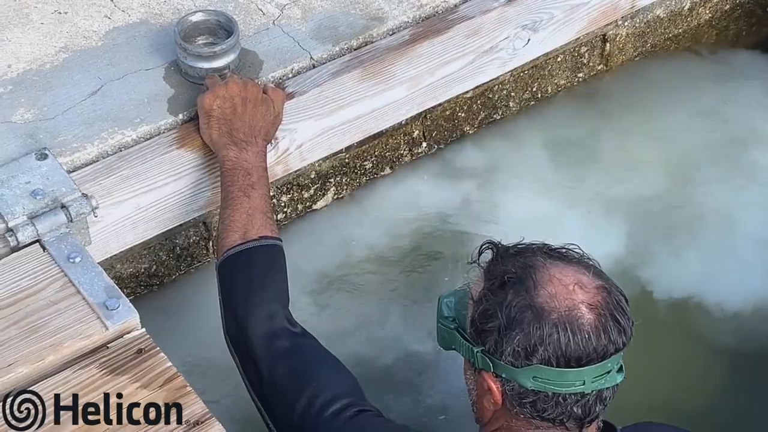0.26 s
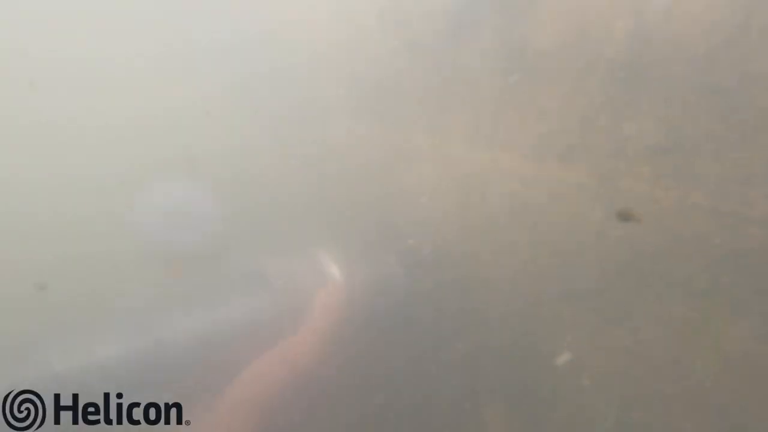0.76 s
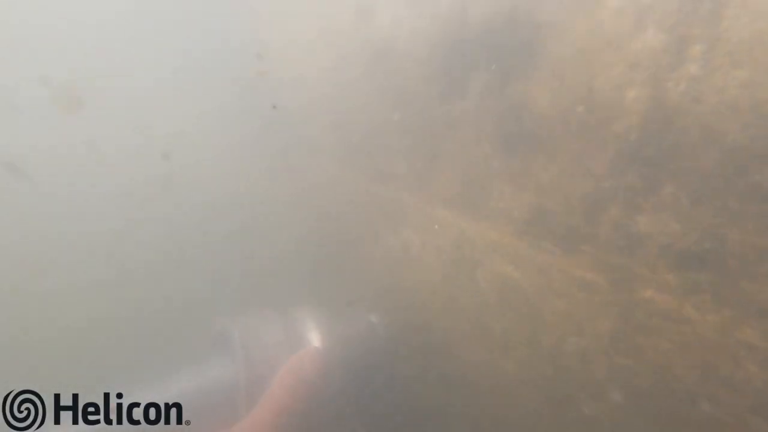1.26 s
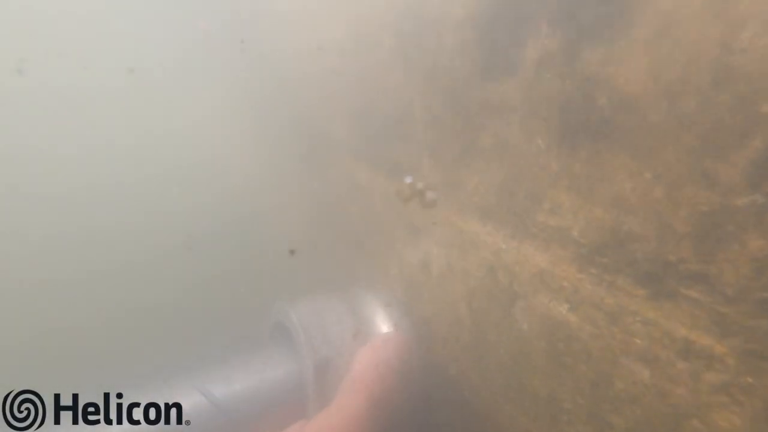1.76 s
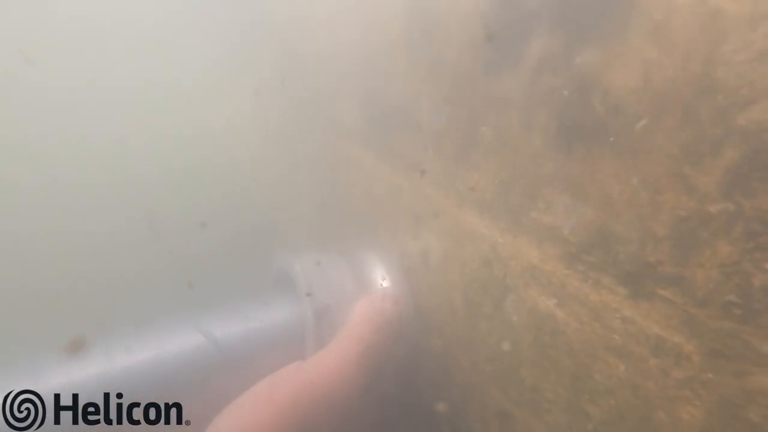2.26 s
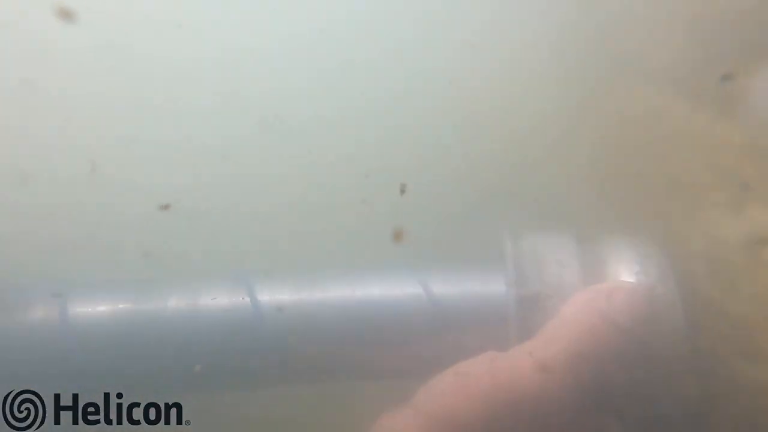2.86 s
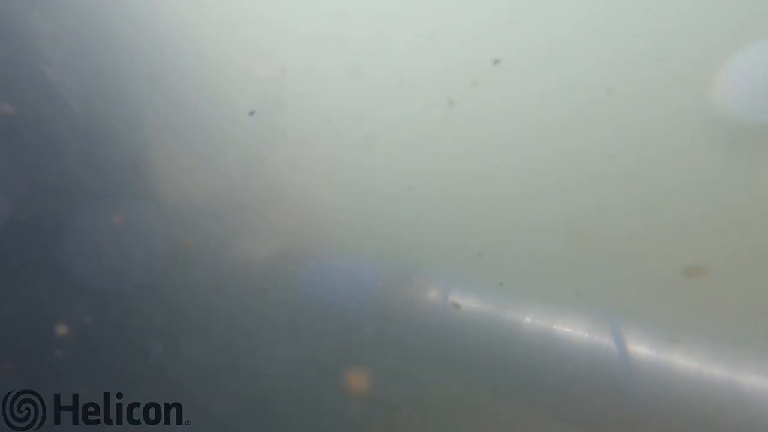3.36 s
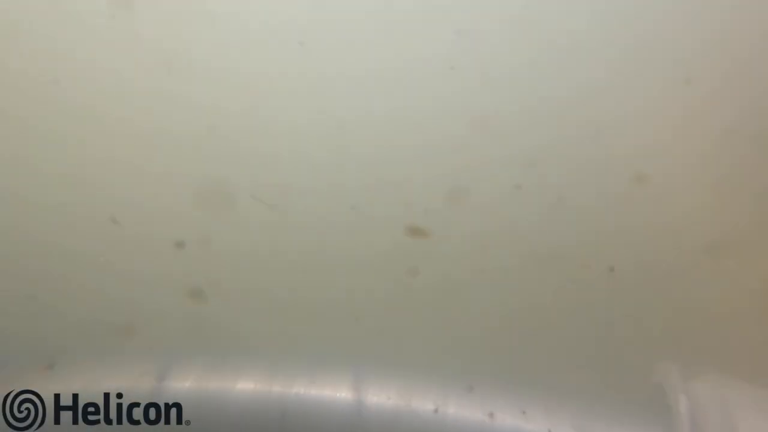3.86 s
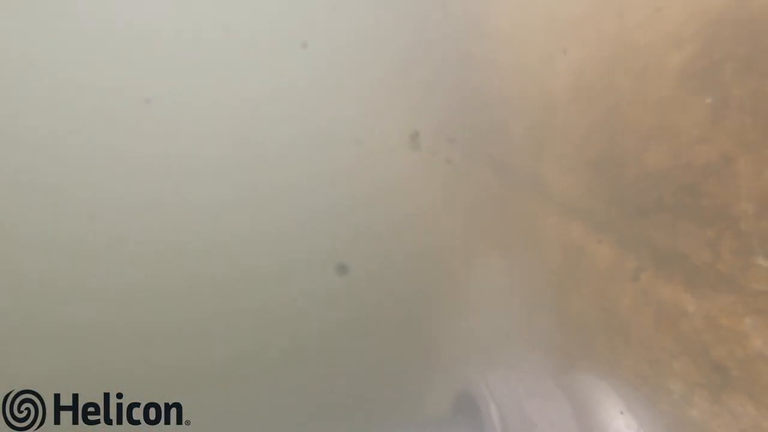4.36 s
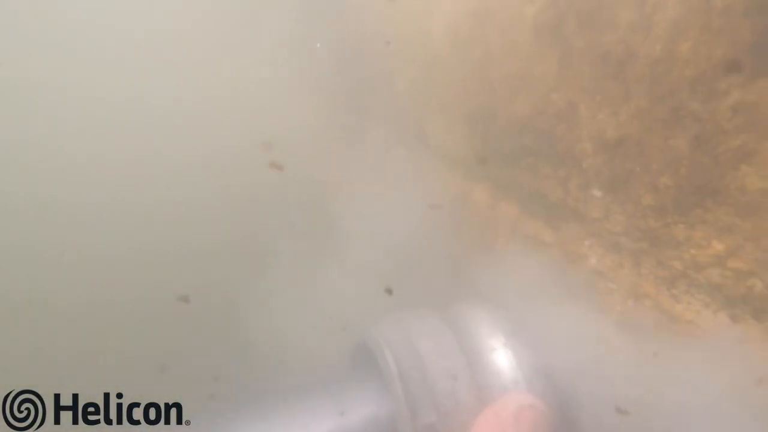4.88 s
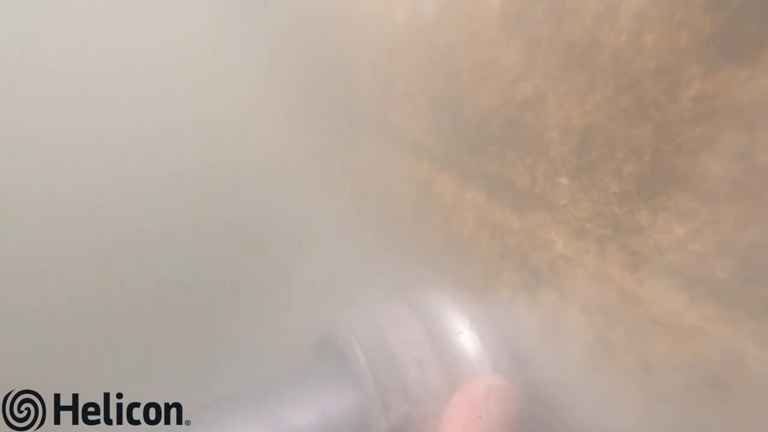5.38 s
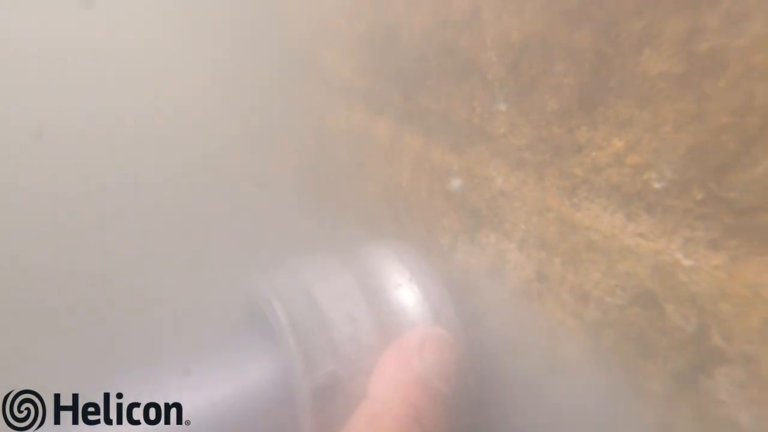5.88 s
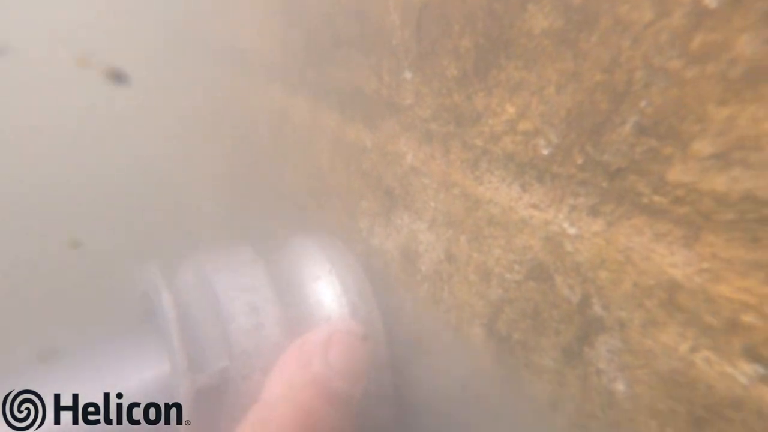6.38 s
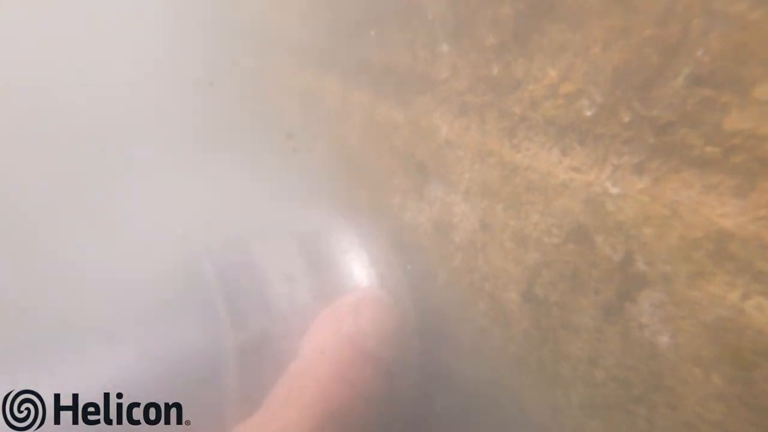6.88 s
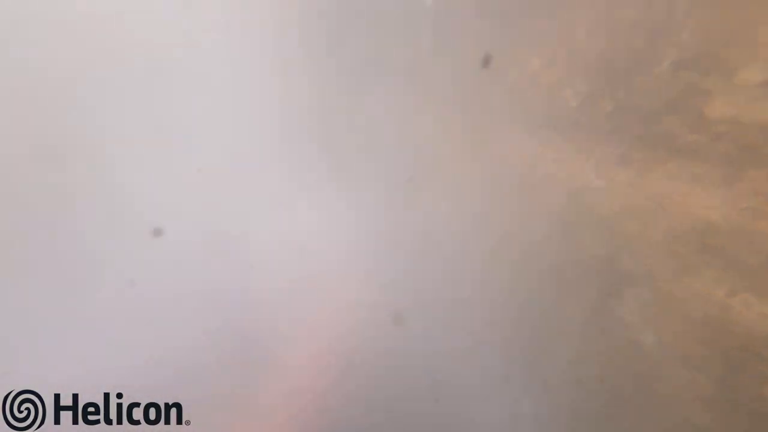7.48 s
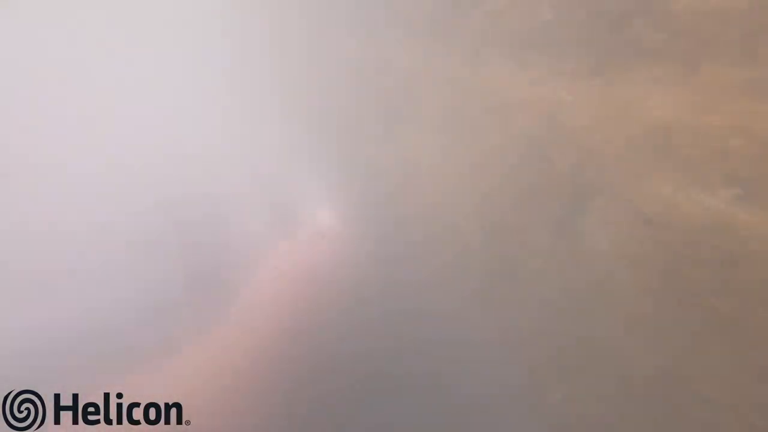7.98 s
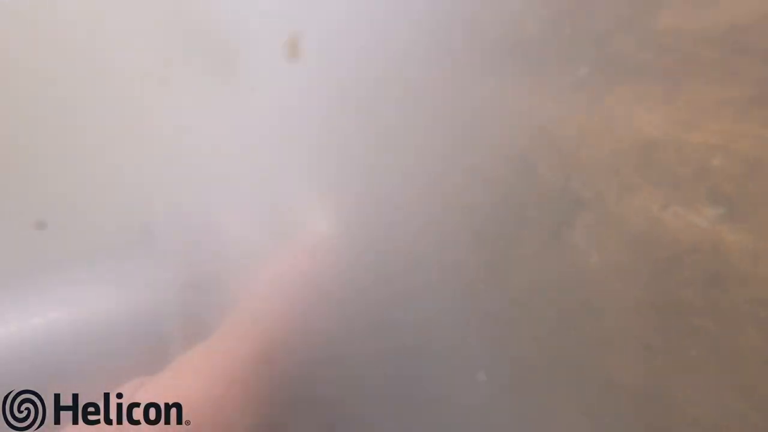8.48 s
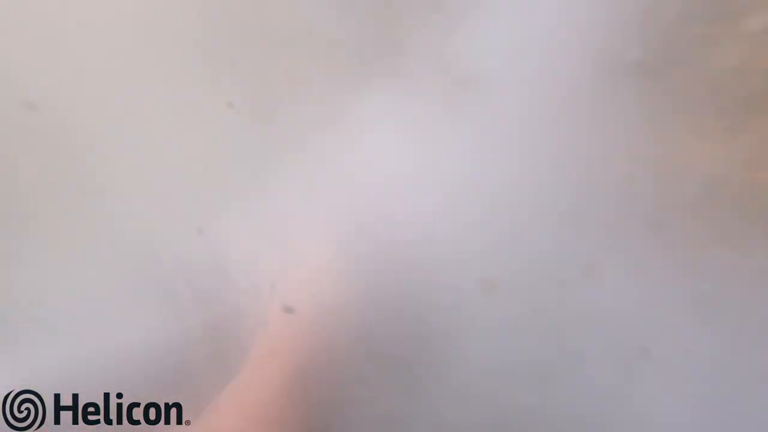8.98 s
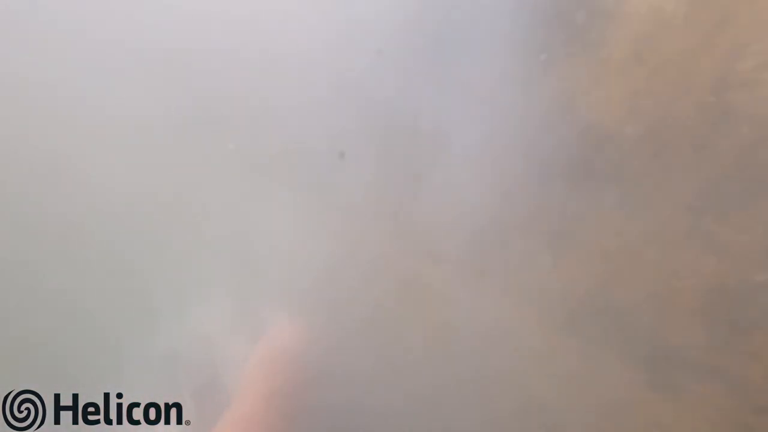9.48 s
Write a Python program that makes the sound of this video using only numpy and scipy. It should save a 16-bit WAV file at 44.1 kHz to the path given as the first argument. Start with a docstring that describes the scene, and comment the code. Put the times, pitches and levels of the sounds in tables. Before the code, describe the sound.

In open air a hydraulic power pack hums and whines for under a second. An abrupt cut goes underwater, heard inside a sealed housing: muffled hiss, low rumble, rubbing, knocks and gurgling bubbles. A drill then spins up quickly with a brief howl and grinds a concrete wall in a dense, steady drone, until it stops sharply and leaves knocks, scrapes and small metallic ringing.

```python
"""In the open air a hydraulic power pack hums: wavering tones, a sagging whine and filtered fan noise.
Then, under water in a sealed housing, the idling drill hisses as filtered grains over rumble and hum.
Hand and gear rub, knock and tick as noise bursts, a metal part rings and bubbles gurgle as short tones.
The motor spins up as orders of its shaft speed; the core bit grinds concrete as dense grains, and stops."""
import sys
import numpy as np
from scipy import signal
from scipy.fft import rfft, irfft
from scipy.io import wavfile

SR = 44100
rng = np.random.default_rng(int(sys.argv[2]) if len(sys.argv) > 2 else 0)


def transcribe(signal):
    """Save signal, clipped to [-1, 1], as a 16-bit WAV file at the path in sys.argv[1]."""
    frames = np.atleast_2d(signal).T
    limited = np.clip(frames, -1, 1)
    pcm = np.round(limited * 32767).astype(np.int16)
    wavfile.write(sys.argv[1], SR, pcm)


N = 429534

DIVE_S = .761   # the air ends, the water begins
START_S, STOP_S = 3.515, 8.97   # the valve opens, the valve shuts
# Hard contacts on the housing: (time [s], relative strength [dB])
KNOCKS = [(1.327, 21), (3.150, 25), (8.999, 13), (9.054, 18), (9.15, 12.5), (9.167, 1), (9.187, 14),
          (9.198, 8), (9.217, 12.5), (9.252, 10), (9.278, 6), (9.293, 2), (9.316, 4), (9.335, 17.5)]


def from_db(db):
    """Decibel law: 20 dB is a factor of ten in amplitude."""
    return 10 ** (np.asarray(db) / 20)


def rms_one(x):
    """Normalisation to unit root-mean-square amplitude."""
    return x / np.sqrt(np.mean(x ** 2) + 1e-20)


def in_time(rows):
    """Linear interpolation of the columns in time, and a gate that is open while the rows last."""
    s, *columns = np.transpose(rows)
    t = np.arange(N) / SR
    gate = (t >= s[0]) & (t < s[-1])
    return [np.interp(t, s, column) for column in columns] + [gate]


def drift(rate_hz):
    """Random modulation of spread 1: white noise through two equal poles at the given rate."""
    step = 40   # samples between computed points
    r = np.exp(-2 * np.pi * rate_hz * step / SR)
    noise = rng.standard_normal(N // step + 2002)
    slow = signal.lfilter([1], [1, -2 * r, r * r], noise)[2000:]   # settled part
    return np.interp(np.arange(N) / step, np.arange(len(slow)), rms_one(slow))


def band_filter(x, order, hz, kind):
    """Butterworth filtering: maximally flat in the pass band."""
    return signal.sosfilt(signal.butter(order, hz, kind, fs=SR, output="sos"), x)


def response_db(points, modes=(), column=1):
    """Magnitude response in dB: a curve over log frequency plus resonance peaks and notches."""
    hz, points = np.linspace(1, SR / 2, 4097), np.array(points)
    db = np.interp(np.log(hz), np.log(points[:, 0]), points[:, column])
    for mode_hz, width_hz, gain_db in modes:
        db = db + gain_db / (1 + (2 * (hz - mode_hz) / width_hz) ** 2)
    return db


def colour(x, db, lead=0):
    """Minimum-phase filtering by folding the cepstrum, with a phase lead (rad) given at each frequency."""
    cepstrum = irfft(db * np.log(10) / 20)
    half = len(cepstrum) // 2
    cepstrum[1:half] *= 2
    cepstrum[half + 1:] = 0
    impulse = irfft(np.exp(rfft(cepstrum) + 1j * lead))
    # The lead spreads the response to negative times: make room, then take the delay off.
    return signal.oaconvolve(x, np.roll(impulse, 256))[256:][:N]


def grains(per_s, spread_db):
    """Shot noise: two trains of clicks at the same random moments with uneven sizes; rms 1."""
    struck = rng.random(N) < per_s / SR
    sizes = struck * from_db(spread_db * np.minimum(rng.exponential(1, N), 4))
    return rms_one(sizes * rng.standard_normal((2, N)))


def housing(common, own):
    """Coherence of two ports: the common part alike, the own part in opposition, each through its wall."""
    # Wall transmission: (frequency [Hz], left [dB], right [dB], lead of the left port over the right [rad])
    wall = [(39, -16.5, -16.5, 0), (158, -6.5, -7.5, 0), (232, -0.5, -2.5, 1), (682, -10, -9, -0.9),
            (810, -4, -2.5, 0.46), (1120, -9, -8, 1.1), (1400, -0.5, -5, 0.5), (1590, -7.5, -10, 0.09),
            (2313, -28.5, -16.5, -1), (2910, -39.5, -33, 0.1), (4040, -34, -37, 0.1),
            (4480, -41.5, -40, 0.6), (9170, -53.5, -52.5, 0.65), (15100, -71.5, -61.5, 3.5)]
    # Wall resonances and notches: (frequency [Hz], width [Hz], gain [dB])
    wall_modes = [(226, 45, 4), (1590, 70, 4), (1825, 130, -7), (1975, 80, 4), (2300, 120, 3),
                  (2650, 50, 5), (3600, 500, 6), (6050, 750, 10), (8540, 700, 6)]
    # Likeness of the two ports: (frequency [Hz], coherence [0-1])
    likeness = [(400, 1), (1500, 0.8), (12000, 0.19)]
    alike = np.clip(response_db(likeness), 0, .99)
    lead = response_db(wall, column=3) / 2   # half to each port
    share_db, rest_db = 10 * np.log10((1 + alike) / 2), 10 * np.log10((1 - alike) / 2)
    ports = []
    for column, sign in ((1, 1), (2, -1)):
        db = response_db(wall, wall_modes, column=column)
        shared = colour(common, db + share_db, sign * lead)
        ports.append(shared + sign * colour(own, db + rest_db))
    return np.array(ports)


def power_pack():
    """Superposition of wavering engine lines, a sagging pump whine and fan noise, alike on both sides."""
    # Engine hum: (frequency [Hz], mean level [dB rms])
    engine_lines = [(113.0, -34.5), (183.0, -39), (215.3, -40.5), (258.4, -38), (387.6, -38), (430.7, -42),
                    (473.7, -37)]
    # Pump whine partials: (multiple of the whine pitch [-], mean level [dB rms])
    whine_partials = [(1, -42), (1.39, -48), (2.202, -50)]
    # Fan noise spectrum: (frequency [Hz], relative density [dB per Hz])
    fan_spectrum = [(30, -16), (109, -11.5), (308, -9.5), (488, -6), (643, -18.5), (974, -14.5),
                    (5880, -33), (7400, -15.5), (9620, -79)]
    # Fan casing resonances: (frequency [Hz], width [Hz], gain [dB])
    casing_modes = [(4230, 180, 3), (5900, 44, 12)]
    whine_from_hz, whine_to_hz, sag_s = 1005, 920, .35
    t = np.arange(N) / SR
    engine = 0
    for hz, db in engine_lines:
        level = np.sqrt(2) * from_db(db + .88 * drift(3.7))
        engine = engine + level * np.sin(2 * np.pi * (hz * t + rng.random()))
    whine_hz = whine_to_hz + (whine_from_hz - whine_to_hz) * np.exp(-t / sag_s)
    phase = 2 * np.pi * np.cumsum(whine_hz) / SR
    whine = sum(np.sqrt(2) * from_db(db + 2.0 * drift(15)) * np.sin(k * phase) for k, db in whine_partials)
    fan = from_db(-30.5) * rms_one(colour(rng.standard_normal(N), response_db(fan_spectrum, casing_modes)))
    low_pass = signal.cheby2(10, 60, 7760, fs=SR, output="sos")   # 60 dB down from 7760 Hz
    return signal.sosfilt(low_pass, engine + whine + fan) * (t < DIVE_S)


def dips():
    """Amplitude modulation: the level dips briefly, falling fast and creeping back exponentially."""
    # Brief dips: (time [s], nominal depth [dB])
    dip_rows = [(3.158, 12), (6.83, 3), (7.719, 2)]
    fall_s, back_s = .0028, .082
    t = np.arange(N) / SR
    loss_db = 0
    for s, db in dip_rows:
        fall = np.clip((t - s) / fall_s, 0, 1)
        loss_db = loss_db + db * fall * np.exp(-np.maximum(t - s, 0) / back_s)
    return from_db(-loss_db)


def idling():
    """Flow noise: oil hisses in the resting motor, the far pump hums, water rumbles at each port alone."""
    # Motor at rest, drowned while the bit cuts: (time [s], oil hiss drive [dB], water rumble drive [dB])
    idle_levels = [(.761, -17, -26.5), (1.05, -8.5, -25), (1.3, -7, -33.5), (2.5, -2.5, -31.5),
                   (3.15, 2, -24.5), (3.52, -2, -33.5), (3.7, -15, -42), (9.74, -17, -40)]
    # Oil hiss spectrum: (frequency [Hz], gain [dB])
    oil_spectrum = [(400, -7.5), (900, -14.5), (1400, -2), (1720, 2), (2050, -16.5), (3000, -23.5),
                    (8000, -20), (15000, -13.5)]
    hum_hz, hum_db = 111.3, -33   # peak level
    hiss_db, rumble_db, on = in_time(idle_levels)
    oil = np.array([colour(g, response_db(oil_spectrum)) for g in grains(5000, spread_db=-6.0)])
    hiss = housing(*(on * from_db(hiss_db + 1.1 * drift(13.0)) * oil))
    rumble = rms_one(band_filter(rng.standard_normal((2, N)), 2, [22, 110], "band"))
    rumble = from_db(rumble_db + [[5], [-1]]) * rumble   # left stronger than right
    t = np.arange(N) / SR
    hum = from_db(hum_db) * np.sin(2 * np.pi * hum_hz * t) * (t < START_S)
    return hiss + on * (rumble + hum)


def ticks():
    """Impulsive excitation: hard specks strike close to the ports as bright, very short clicks."""
    # Grit ticks on the housing: (time [s], strength before the band filter [dB])
    grit_ticks = [(1.3895, -33), (1.7846, -22.5), (2.8986, -27.5), (6.4547, -21)]
    specks_per_s, specks_db = 11.0, -45   # fainter ticks at random
    count = round(specks_per_s * N / SR)
    moments = rng.uniform(DIVE_S, N / SR - .01, count)
    faint = np.transpose([moments, rng.normal(specks_db, 3, count)])
    decay = np.exp(-np.arange(24) / 17.0)
    clicks = np.zeros((2, N))
    for s, db in [*grit_ticks, *faint]:
        clicks[:, round(s * SR):][:, :24] = from_db(db) * rng.standard_normal((2, 24)) * decay
    return band_filter(clicks + 1e-18, 2, [5000, 13000], "band")


def bubbles():
    """Bubble resonance: trapped air swells into a fluttering, rising tone; low pitches last longer."""
    # Gurgling pockets of air: (time [s], level before flutter [dB peak], pitch at birth [Hz])
    pockets = [(1.109, -15.5, 310), (1.136, -15.5, 221), (1.171, -16, 242), (1.475, -11.5, 426),
               (1.51, -7.5, 393), (1.659, -13.5, 247), (1.722, -17, 258), (1.908, -15, 260),
               (2.596, -17, 280), (2.629, -19, 330), (2.956, -40.5, 3500), (3.523, -16, 204),
               (4.819, -13.5, 293), (4.931, -15, 335), (5.659, -11.5, 313), (5.671, -12, 237),
               (6.293, -19, 258), (6.773, -11, 268), (7.659, -11.5, 336), (8.538, -17, 252),
               (8.571, -12, 390), (9.205, -24, 2030), (9.626, -44, 3760), (9.718, -25, 2410)]
    least_s, cycles = .011, 8.1   # length = least + cycles / pitch
    out, flutter = np.zeros(N), from_db(3.4 * drift(110))
    for s, db, hz in pockets:
        length = least_s + cycles / hz
        u = np.arange(min(round(length * SR), N - round(s * SR))) / SR
        rise_hz = 25 * u / length   # mean rise since birth; the pitch itself rises twice this
        swell = np.sin(np.pi * (u / length) ** .5) ** 2
        out[round(s * SR):][:len(u)] += from_db(db) * swell * np.sin(2 * np.pi * (hz + rise_hz) * u)
    return out * flutter * from_db([[.7], [-.7]])


def rubs():
    """Stick-slip friction: a rub is a run of slips that shakes loose parts; a knock is one brief contact."""
    # Rubs on the housing: (time [s], strength before the filters [dB], length [s])
    rub_rows = [(0.989, -6, 0.07), (1.225, -12.5, 0.09), (1.297, -8, 0.12), (1.434, -8.5, 0.08),
                (1.472, -7, 0.087), (1.582, -8.5, 0.11), (1.86, -2.5, 0.085), (1.997, -9, 0.034),
                (2.032, -4, 0.074), (2.129, 1.5, 0.013), (2.579, -6, 0.072), (2.948, -9, 0.029),
                (9.08, -23, 0.36), (9.409, -18, 0.055), (9.46, -11, 0.1), (9.561, -9.5, 0.11),
                (9.669, -22.5, 0.047), (9.715, -8, 0.036)]
    # Resonance of the loose parts: (frequency [Hz], width [Hz], gain [dB])
    loose_modes = [(3410, 450, 5.5)]
    rise_s = .006
    t, effort = np.arange(N) / SR, np.zeros(N)
    for s, db, length in rub_rows:
        a, b = round(s * SR), min(N, round((s + 2 * length) * SR))
        u = t[a:b] - s
        effort[a:b] += from_db(db) * np.exp(-(u / length) ** 8) * np.minimum(u / rise_s, 1)
    slips = effort * from_db(2.2 * drift(45)) * grains(3500, spread_db=1.2)
    knock_decay = np.exp(-np.arange(200) / 70)
    for s, db in KNOCKS:
        slips[:, round(s * SR):][:, :200] += from_db(db - 13) * rng.standard_normal((2, 200)) * knock_decay
    dull = band_filter(slips, 2, 1300, "low")
    edge_db = np.where(t < START_S, 3, 12)   # the contacts are sharper from the start of the drill on
    loose_db = response_db([(500, -5.5), (2200, -6.5), (4500, -12.5), (15000, -12.5)], loose_modes)
    sharp = np.array([colour(g, loose_db) for g in from_db(edge_db) * slips])
    return housing(*(dull + sharp))


def chimes():
    """Modal ringing: a shaken metal part rings at one pitch; after the valve shuts, knocks excite beating modes."""
    # Shakes of a small metal part: (time [s], level before flutter and panning [dB peak])
    clinks = [(1.87, -48), (2.11, -49.5), (2.97, -55), (9.118, -44), (9.149, -48), (9.356, -46),
              (9.42, -41), (9.531, -40), (9.579, -42)]
    ring_hz, ring_t60_s, shake_s = 2730, .25, .02   # it rings down after a shake this long
    # After the valve shuts the bit rattles, and a lower, louder resonance of the housing sounds
    # with each knock: (frequency [Hz], relative level [dB])
    knock_modes = [(3450, -50), (1530, -28)]
    knock_t60_s, knock_rise_s = .06, .001
    out, u = np.zeros(N + SR), np.arange(SR // 5) / SR
    for s, db in clinks:
        decay_db = -60 * np.maximum(u - shake_s, 0) / ring_t60_s
        swell = np.minimum(u / shake_s, 1) * from_db(db + decay_db)
        out[round(s * SR):][:len(u)] += swell * np.sin(2 * np.pi * (ring_hz * u + rng.random()))
    soft_onset = 1 - np.exp(-(u / knock_rise_s) ** 2)
    for s, db in KNOCKS:
        after_stop = s > STOP_S
        tones = 0
        for hz, level_db in 2 * knock_modes:   # pairs of slightly different pitch beat
            tones = tones + from_db(level_db) * np.sin(2 * np.pi * hz * rng.normal(1, .05) * u)
        envelope = from_db(db / 2 - 60 * u / knock_t60_s) * soft_onset
        out[round(s * SR):][:len(u)] += after_stop * envelope * tones
    return out[:N] * from_db(3 * drift(50) + [[-3], [3]])


def swarm(per_s, low_hz, high_hz, cycles):
    """Damped resonance: bubbles born at random ring for some cycles (60 dB) at eight pitches; rms 1."""
    born, dealt, out = grains(per_s, spread_db=4.0)[0], rng.integers(0, 8, N), 0
    for k, hz in enumerate(np.geomspace(low_hz, high_hz, 8)):
        r, w = from_db(-60 * hz / (cycles * SR)), 2 * np.pi * hz / SR
        struck = born * (dealt == k) + 1e-18
        out = out + signal.lfilter([0, np.sin(w)], [1, -2 * r * np.cos(w), r * r], struck)
    return rms_one(out)


def cutting():
    """Order excitation: unbalance and gear tones follow the shaft; diamond grit scrapes as shot noise."""
    # Shaft speed: (time [s], speed before a slight waver [turns per s])
    shaft_speed = [(3.515, 34), (3.58, 59), (3.63, 77), (3.7, 82.5), (3.8, 86.3), (4.1, 90.1), (6, 91.8),
                   (8.9, 92.2), (9.0, 87), (9.11, 60)]
    # Shaft and gear orders: (multiple of the shaft speed [-], ...)
    orders = (2, 3, 6, 9, 11, 22, 66, 132)
    # Drive of each order relative to the unbalance tone: (level [dB], ...)
    orders_db = (-13, -14, -13, -13, -10, -10, -1, 17)
    # Orders that howl under the strain of spin-up: (multiple [-], peak drive before the body filter [dB])
    strained = [(17, -12), (22, -6), (31, -10)]
    # The drill body passes the howl in this band: (low edge [Hz], high edge [Hz])
    howl_band = [1200, 1700]
    # Drive of the fine grit: (time [s], level [dB])
    fine_grit = [(3.515, -3), (4.1, 2.5), (5.7, 3.5), (9.0, 2.5), (9.115, -2)]
    coast_s, strain_s, mesh_rise_s, bite_s = .15, .1, .05, .03   # coast to rest; strain peak; onsets
    unbalance_db, coast_tone_loss_db, coast_grit_loss_db = -18.5, 48, 16   # left rms at full speed; losses
    coarse_drive_db, surge_db, settle_s = -3.5, 4, 1.0   # grinding starts harder and settles
    sizzle_hz, sizzle_db, sizzle_s = 6940, 6.5, 1   # the top of the grit is brighter at first

    t, speed = np.arange(N) / SR, in_time(shaft_speed)[0]
    run, coast = np.maximum(t - START_S, 0), np.clip((t - STOP_S) / coast_s, 0, 1)
    on = (run > 0) & (coast < 1)
    # The unbalance force grows with the square of the speed.
    tone_db = unbalance_db + 2 * 20 * np.log10(speed / speed.max()) - coast_tone_loss_db * coast ** 2
    settling_db = surge_db * np.exp(-run / settle_s)
    turn = 2 * np.pi * np.cumsum(speed * (1 + .00172 * drift(9.7))) / SR
    play = .02 * drift(40)   # play in the teeth (rad of shaft) blurs the high orders most

    gears = 0
    for k, db in zip(orders, orders_db):
        load_db = 2.5 * settling_db * (k < 20)   # the low orders feel the harder start
        level = from_db(tone_db + load_db + db + 3.5 * drift(25) + 2.5 * drift(2))
        gears = gears + level * np.sin(k * (turn + play) + 2 * np.pi * rng.random())
    gears = gears * (1 - np.exp(-run / mesh_rise_s)) * (1 - coast) ** 5
    strain = run / strain_s * np.exp(1 - run / strain_s)
    howl = strain * sum(from_db(db + 4.5 * drift(70)) * np.sin(k * (turn + play)) for k, db in strained)
    gears += band_filter(howl, 2, howl_band, "band")

    unbalance = np.sqrt(2) * from_db(tone_db + 1.97 * drift(8.4)) * np.sin(turn)
    sides = np.array([unbalance, np.roll(unbalance, 20) * from_db(-4.5)])   # right: later and weaker

    bite = from_db(.7 * drift(29) + 1.0 * drift(3.6) - coast_grit_loss_db * coast ** 3)
    grit = grains(6000, spread_db=1.5)
    coarse = band_filter(grit, 2, 2500, "low")
    sizzle = from_db(sizzle_db) * np.exp(-run / sizzle_s) * band_filter(grit, 2, sizzle_hz, "high")
    fine_level = from_db(in_time(fine_grit)[0]) * np.minimum(run / bite_s, 1) ** 2
    fine = fine_level * (grit - coarse + sizzle)
    common, own = bite * (from_db(coarse_drive_db + settling_db) * coarse + fine)
    # Air in the flushing water, below the grinding
    flush = from_db(-30) * swarm(120, low_hz=190, high_hz=400, cycles=16)
    return on * sides + housing(on * (common + gears + flush), on * own)


def scene():
    """Superposition: air first, then everything under water."""
    drill = dips() * (idling() + cutting())
    return power_pack() + drill + rubs() + chimes() + bubbles() + ticks()


def record(dry):
    """Soft saturation rounds the peaks; a steep elliptic low-pass cuts the top."""
    low_pass = signal.ellip(12, .5, 70, 15750, fs=SR, output="sos")   # .5 dB ripple, 70 dB stop, edge in Hz
    return signal.sosfilt(low_pass, 1.198 * np.tanh(dry / 1.178))


dry = scene()
out = record(dry)
transcribe(out)
```